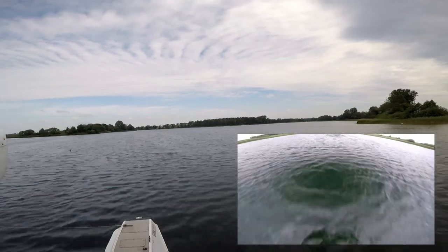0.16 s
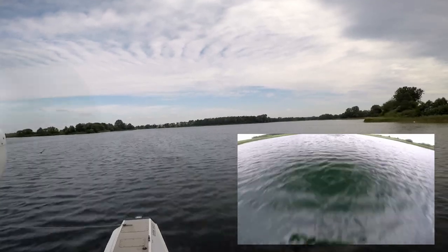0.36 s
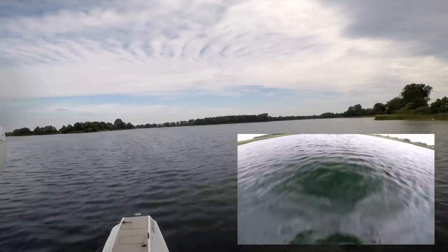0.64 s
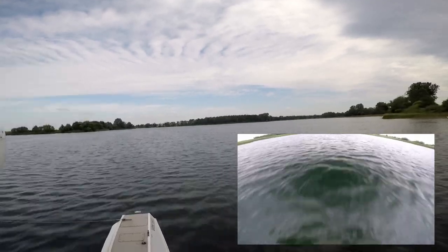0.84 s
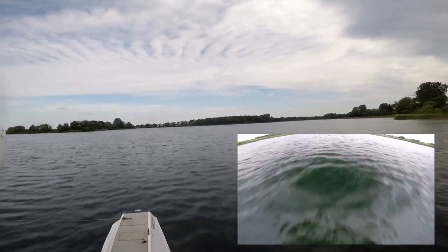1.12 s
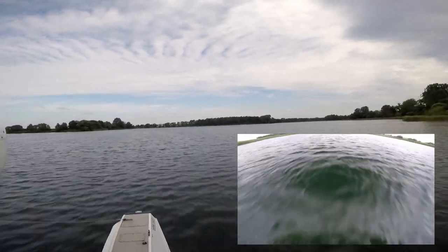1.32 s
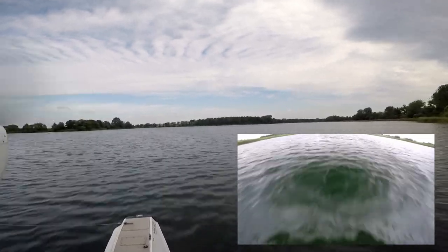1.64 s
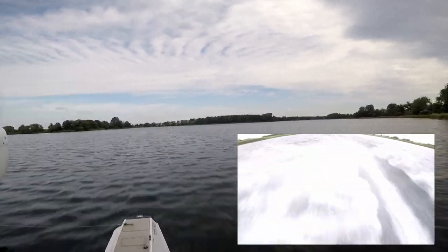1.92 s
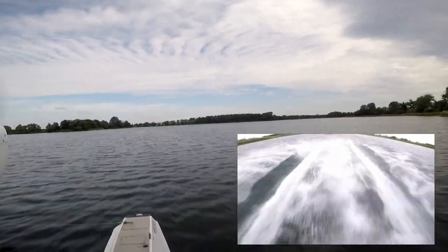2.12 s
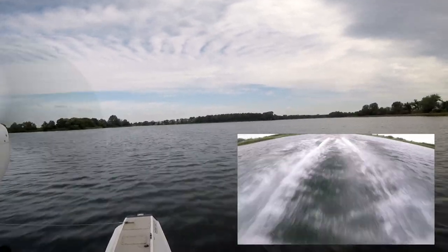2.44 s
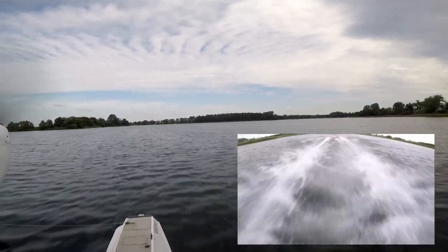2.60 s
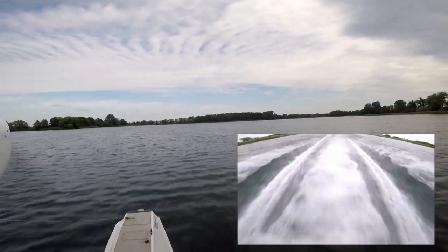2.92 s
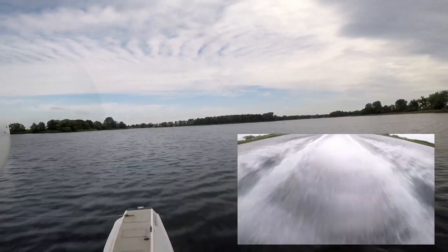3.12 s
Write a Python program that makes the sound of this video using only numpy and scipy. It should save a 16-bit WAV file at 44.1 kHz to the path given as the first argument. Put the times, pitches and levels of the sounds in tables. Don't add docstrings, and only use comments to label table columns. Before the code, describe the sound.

Small propeller aircraft engine drones downward in buffeting wind, then floats hit water with roaring spray.

```python
import sys
import numpy as np
from scipy import signal
from scipy.fft import rfft, irfft, next_fast_len
from scipy.io import wavfile
from scipy.ndimage import uniform_filter1d, map_coordinates

SR = 44100
rng = np.random.default_rng(int(sys.argv[2]) if len(sys.argv) > 2 else 0)


def log_audio(samples):
    frames = np.atleast_2d(samples).T
    limited = np.clip(frames, -1, 1)
    pcm = np.round(limited * 32767).astype(np.int16)
    wavfile.write(sys.argv[1], SR, pcm)


def gain_from_db(level_db):
    decades = np.asarray(level_db, float) / 20
    return 10 ** decades


N = 143766

# time_s, blade_rate_hz, first_order_db, second_order_db
BLADES = [
    (0, 61, -17, -24),
    (.3, 58.5, -14.5, -24),
    (.62, 55.3, -15, -19),
    (.8, 53.3, -22, -17),
    (1.0, 51.3, -17, -18.5),
    (1.25, 48.7, -15.5, -19),
    (1.45, 46.5, -20.5, -23),
    (1.7, 45, -27, -34),
    (2.0, 44, -24, -36),
]


def unit(x):
    return x / np.sqrt(np.mean(x ** 2) + 1e-20)


def curves(rows):
    time_s, *columns = np.transpose(rows)
    return [np.interp(np.arange(N) / SR, time_s, column) for column in columns]


def wobble(rate_hz):
    return map_coordinates(rng.standard_normal(400), [np.arange(N) * rate_hz / SR])


def filtered(x, response):
    size = next_fast_len(N + SR // 2)
    return irfft(rfft(x, size) * response(np.fft.rfftfreq(size, 1 / SR)), size)[..., :N]


def rush(spectrum, patchy_db):
    cells = signal.stft(rng.standard_normal(N), nperseg=512)[2]
    patches = uniform_filter1d(rng.standard_normal(cells.shape), size=8, axis=0)
    patches = uniform_filter1d(patches, size=8, axis=1)
    noise = signal.istft(cells * gain_from_db(patchy_db * unit(patches)), nperseg=512)[1][:N]
    knot_hz, knot_db = np.transpose(spectrum)

    def colour(hz):
        return gain_from_db(np.interp(np.log(hz + 1), np.log(knot_hz + 1), knot_db, -60, -120))

    return unit(filtered(noise, colour))


def blade_phase():
    jitter_hz = 0.25
    return 2 * np.pi * np.cumsum(curves(BLADES)[0] + jitter_hz * wobble(8.5)) / SR


def engine(phase):
    # blade_rate_multiple, level_db
    upper_orders = [
        (2, 0),
        (3, -14),
        (4, -14),
    ]
    fade_s, order_wobble_db = 0.25, 1.0
    fade = np.clip((BLADES[-1][0] - np.arange(N) / SR) / fade_s, 0, 1)
    _, first_db, second_db = curves(BLADES)
    orders = [(0.96, first_db)] + [(k, second_db + db) for k, db in upper_orders]
    tones = 0
    for multiple, level_db in orders:
        gain = gain_from_db(level_db + order_wobble_db * wobble(7.5))
        tones = tones + gain * np.sin(multiple * phase + rng.uniform(0, 2 * np.pi))
    return np.sqrt(2) * fade * tones


def slipstream(phase):
    # time_s, strength_db
    air_strength = [(0.0, -27.5), (0.01, -36), (0.29, -37), (0.35, -38), (1.52, -33.5), (1.54, -33),
                    (1.64, -35), (1.75, -32.5), (1.98, -30.5), (2.14, -34.5), (3.25, -35), (3.26, -40)]
    # time_s, gain_db
    mist_gain = [
        (0, -1),
        (.8, 4),
        (1.15, 5),
        (1.6, 4),
        (2.0, 0.5),
        (2.25, 2),
        (2.8, 2.5),
        (3.26, 2.5),
    ]
    mist_edges = [7160, 9400]
    # frequency_hz, level_db
    buffet_spectrum = [(7, -18.5), (14, -10), (32, -3.5), (60, -3.5), (110, -7), (200, -12), (600, -21.5),
                       (800, -47.5)]
    # frequency_hz, level_db
    hiss_spectrum = [(210, -12), (350, -3.5), (570, -7.5), (1300, -12.5), (3500, -24.5), (6800, -30),
                     (7800, -39), (10300, -51.5)]
    buffet_db, buffet_follows, lump_db = -16.5, 0.2, 1.5
    hiss_db, flutter_db, chop_depth = -23, 0.21, 0.05

    gust_db = curves(air_strength)[0]
    gust_db = gust_db - gust_db.mean()
    buffet_gain = gain_from_db(buffet_db + buffet_follows * gust_db + lump_db * wobble(12))
    buffet = buffet_gain * rush(buffet_spectrum, patchy_db=0)
    hiss_gain = gain_from_db(hiss_db + gust_db + flutter_db * wobble(24.866))
    hiss = hiss_gain * (1 + chop_depth * np.cos(phase)) * rush(hiss_spectrum, patchy_db=0.5)
    treble = filtered(hiss, lambda hz: np.interp(hz, mist_edges, [0, 1]))
    return buffet + hiss + (gain_from_db(curves(mist_gain)[0]) - 1) * treble


def droplets():
    drops_per_s, centre_hz, spread, decay_cycles = 1500, 1100, 0.55, 3
    draw = rng.random((5000, 3))
    present = np.arange(len(draw)) < drops_per_s * N / SR
    pitch_hz = np.clip(centre_hz * np.exp(spread * 3.8 * (draw[:, 1:2] - 0.5)), 250, 3000)
    cycles = pitch_hz * np.arange(600) / SR
    strength = -np.log(draw[:, 2:] + 1e-6) * present[:, None]
    grains = strength * np.sin(2 * np.pi * cycles) * np.exp(-3 * cycles / decay_cycles)
    at = (draw[:, :1] * N).astype(int) + np.arange(600)
    return unit(np.bincount(at.ravel(), grains.ravel(), N + 600)[:N])


def spray():
    # time_s, effort_db
    contact = [
        (0, -38.5),
        (.9, -28),
        (1.3, -26.5),
        (1.7, -17),
        (1.9, -21),
        (2.2, -16),
        (2.7, -14),
        (3.0, -15.5),
        (3.26, -19),
    ]
    # frequency_hz, level_db
    water_spectrum = [(20, -12), (40, -1.5), (140, -2.5), (300, -10.5), (600, -18.5), (1200, -26),
                      (2500, -39.5), (5000, -48)]
    drop_db, roar_wobble_db = -15, 1.9
    drops = droplets()
    roar = gain_from_db(roar_wobble_db * wobble(14)) * rush(water_spectrum, patchy_db=0.5)
    return gain_from_db(curves(contact)[0]) * (roar + gain_from_db(drop_db) * drops)


def floats():
    # centre_s, pitch_hz, level_db, length_s
    thumps = [(0.105, 98.4, -13, 0.03), (0.51, 91, -29, 0.2), (1.7, 127, -18, 0.053),
              (1.82, 90.7, -21, 0.11), (1.9, 44.2, -9, 0.15), (1.98, 130, -12.5, 0.032),
              (2.2, 110, -18, 0.024), (2.423, 91.4, -16, 0.046), (2.619, 76, -16, 0.066),
              (2.74, 141.5, -14, 0.15), (3.007, 69, -17, 0.072), (3.12, 110, -18, 0.079),
              (3.217, 65.7, -23.5, 0.19)]
    sag_per_s = 0.49
    t = np.arange(N) / SR
    total = 0
    for centre_s, pitch_hz, level_db, length_s in thumps:
        since = t - centre_s
        swell = np.exp(-0.5 * (2.2 * since / length_s) ** 2)
        note = np.sin(2 * np.pi * pitch_hz * since * (1 - sag_per_s * since))
        total = total + gain_from_db(level_db) * np.sqrt(2) * swell * note
    return total


def scene():
    phase = blade_phase()
    mono = engine(phase) + slipstream(phase) + spray() + floats()
    return np.array([mono, mono])


def band_limit(x):
    return signal.sosfilt(signal.butter(12, 10050, fs=SR, output="sos"), x)


def record(dry):
    # frequency_hz, gain_db
    housing = [
        (1000, 0),
        (1330, 1.5),
        (1550, -1.5),
        (2050, 1),
        (3050, -1),
        (3580, 2),
        (3850, -3.5),
        (4600, 0),
    ]
    ceiling, knee, offset, right_db = 1.05, 3.5, -0.001, 1.5
    x = filtered(dry, lambda hz: gain_from_db(np.interp(hz, *np.transpose(housing))))
    x = x / (1 + np.abs(x / ceiling) ** knee) ** (1 / knee) + offset
    mix = x * gain_from_db([[-right_db / 2], [right_db / 2]])
    return band_limit(mix)


dry = scene()
out = record(dry)
log_audio(out)
```